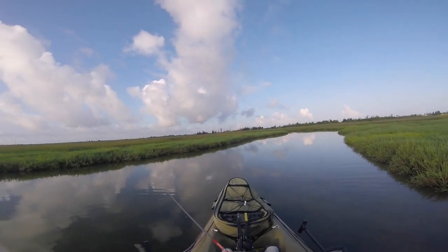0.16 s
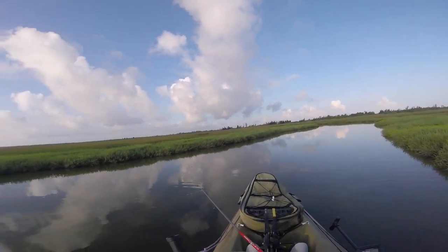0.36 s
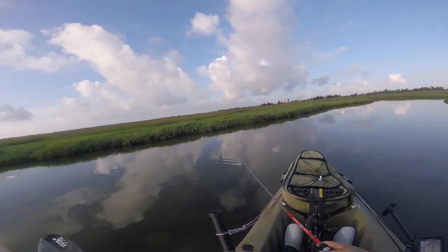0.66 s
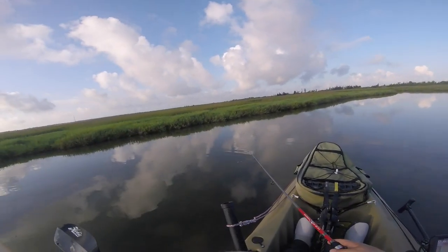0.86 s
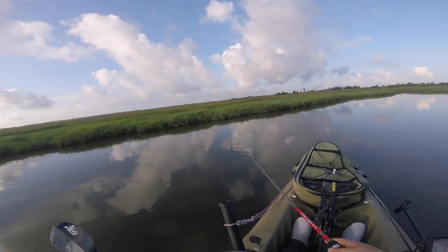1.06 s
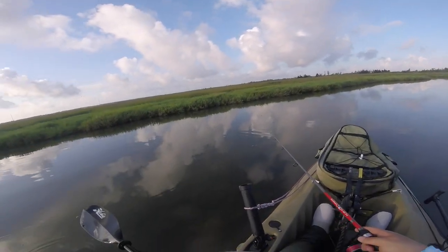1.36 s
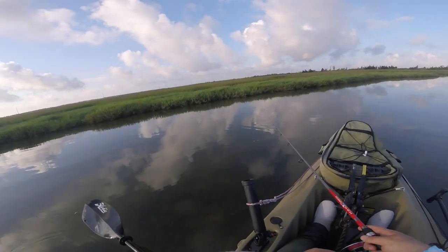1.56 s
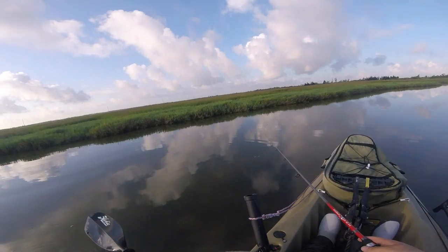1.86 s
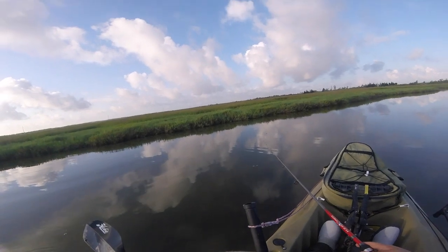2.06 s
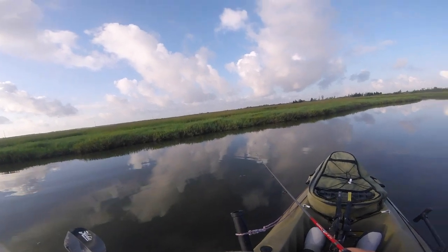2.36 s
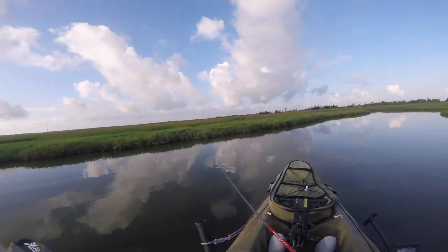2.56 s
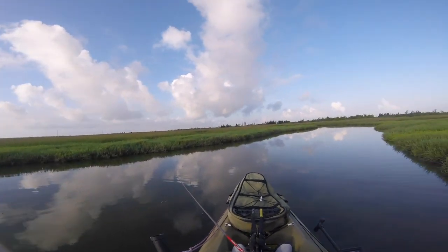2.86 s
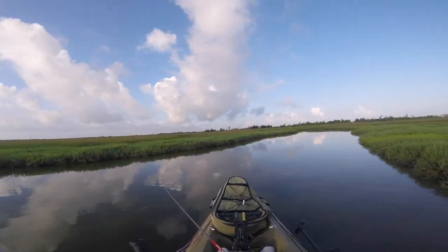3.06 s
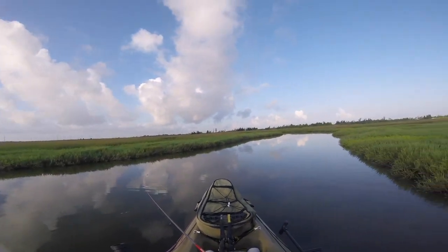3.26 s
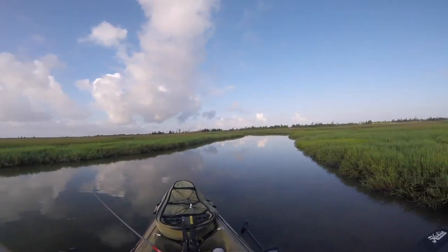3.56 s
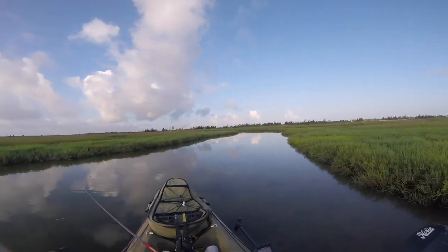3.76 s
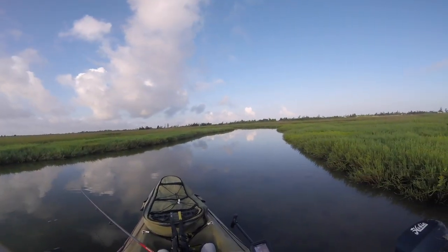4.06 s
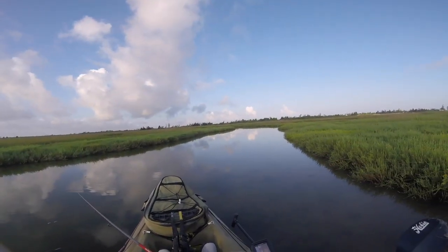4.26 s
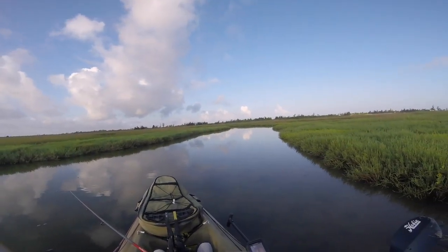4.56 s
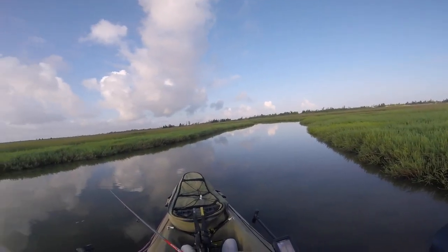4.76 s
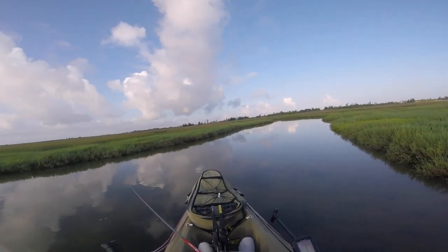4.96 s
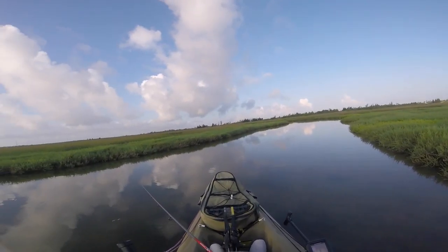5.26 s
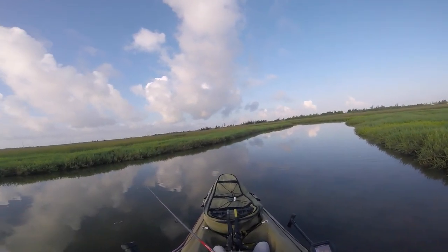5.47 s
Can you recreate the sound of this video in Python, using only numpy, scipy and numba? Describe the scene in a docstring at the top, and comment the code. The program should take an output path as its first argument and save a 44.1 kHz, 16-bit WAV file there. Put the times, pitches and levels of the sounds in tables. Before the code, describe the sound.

A dense chorus of insects buzzes throughout from open marsh, high and rapidly pulsing, above a soft wash and low distant engine rumble. A sharp click snaps close to the microphone early on, and a brighter one comes late. After each, the whole background dips abruptly and slowly returns. Two tiny chirps are barely noticeable near the second click. Mono.

```python
"""A chorus of insects buzzes in the grass of a calm marsh creek, around a drifting kayak: sine tones pulsed by wing
strokes, in a low crowd, a high crowd and one nearer singer, with a faint noise rasp.
Two sharp clicks close to the boat are damped impulses; each makes the camera's limiter duck everything, then recover.
Two tiny chirps are swept sines from the marsh. Filtered noise and a wavering sine make a low distant rumble. Mono.
"""
import sys
import numpy as np
from scipy import signal
from scipy.fft import rfft, irfft
from scipy.io import wavfile
from scipy.ndimage import map_coordinates
from numba import njit

SR = 44100
rng = np.random.default_rng(int(sys.argv[2]) if len(sys.argv) > 2 else 0)


def int16_out(signal):
    """Quantize to a 16-bit WAV file."""
    q = np.round(np.clip(np.atleast_2d(signal).T, -1, 1) * 32767)
    wavfile.write(sys.argv[1], SR, q.astype(np.int16))


N = 248283
T = np.arange(N) / SR  # time in seconds


def undb(db):
    """Decibels to gain."""
    return 10 ** (np.asarray(db) / 20)


def level(x, db):
    """Set the rms level in dB."""
    return x * undb(db) / np.sqrt(np.mean(x ** 2))


def spectrum_db(points, hz):
    """Read (Hz, dB) points on a log-frequency axis."""
    point_hz, point_db = np.transpose(points)
    return np.interp(np.log(hz + 1), np.log(point_hz), point_db)


def colour(x, points):
    """Filter a sound with a curve of (Hz, dB) points."""
    gain = undb(spectrum_db(points, np.fft.rfftfreq(N, 1 / SR)))
    return irfft(rfft(x) * gain, N)


def noise():
    """White noise."""
    return rng.standard_normal(N)


def walk(rate):
    """Smooth random drift with a spread near 1, changing about rate times a second."""
    knots = rng.standard_normal(1024)
    # drawn once per 64 samples, then held
    drift = map_coordinates(knots, [T[::64] * rate], order=3, mode="wrap")
    return drift[np.arange(N) // 64]


# Colour of the distant rumble. Each row: frequency in Hz, relative density in dB per Hz.
RUMBLE_COLOUR = [(10, -27), (20, -8), (32, -2), (48, -4.5), (72, -6), (88, -1.5), (108, -6), (138, -5),
                 (160, -8.5), (210, -11), (280, -16), (360, -22.5), (600, -35.5), (1500, -61.5)]
# Colour of the softer wash above it. Each row: frequency in Hz, relative density in dB per Hz.
WASH_COLOUR = [(150, -18), (400, 1), (700, -1), (1030, -1), (1400, -5), (2000, -7.5), (2800, -10.5),
               (3500, -14.5), (4300, -19.5), (6000, -21), (13000, -27.5)]
# A far engine's unsteady drone. The row: mean pitch in Hz, width of its wander in Hz, level in dB with its
# flutter included.
ENGINE_DRONE = (45.5, 7.03, -32)


def distance():
    """Far motors carry over the flat water as a rumble, a drone and a soft wash that swells once."""
    rumble = level(colour(noise(), RUMBLE_COLOUR), -30.0) * undb(0.76 * walk(5.05))

    hz, width_hz, drone_db = ENGINE_DRONE
    drone_hz = hz + width_hz / 2 * walk(12)
    drone_tone = np.sin(2 * np.pi * np.cumsum(drone_hz) / SR)
    drone = level(drone_tone * undb(1.4 * walk(6)), drone_db)

    # the swell rises and falls by 1/e in each swell_s
    crest_s, swell_s, crest_db = 1.6, 0.56, 1.5
    swell_db = crest_db * np.exp(-np.abs(T - crest_s) / swell_s)
    wash = level(colour(noise(), WASH_COLOUR), -41.0) * undb(swell_db + 0.67 * walk(8))
    return rumble + drone + wash


# Tiny marsh chirps. Each row: start in seconds, length in seconds, start, middle and end pitch in Hz, peak in dB.
MARSH_CHIRPS = [(4.048, 0.014, 3800, 3560, 3000, -36.5), (4.742, .03, 7340, 7400, 7260, -41)]


def chirps():
    """Brief whistles from the grass: sines on a curved pitch glide, swelling and fading as half a sine."""
    out = np.zeros(N)
    for start_s, length_s, *pitch, db in MARSH_CHIRPS:
        progress = np.linspace(0, 1, int(length_s * SR))
        hz = np.polyval(np.polyfit([0, .5, 1], pitch, 2), progress)
        tone = np.sin(2 * np.pi * np.cumsum(hz) / SR)
        i = int(start_s * SR)
        out[i:i + len(progress)] += undb(db) * np.sin(np.pi * progress) * tone
    return out


def ring(x, hz, width_hz):
    """One resonance: a decaying complex rotation, faster to die the wider it is."""
    pole = np.exp((2j * np.pi * hz - np.pi * width_hz) / SR)
    return signal.lfilter([1], [1, -pole], x).imag


def scatter(x, t60):
    """A diffuse tail of many small reflections, with unit energy, falling 60 dB in t60 seconds."""
    t = T[:SR // 4]
    tail = rng.standard_normal(len(t)) * np.exp(-np.log(1000) * t / t60)
    return signal.fftconvolve(x, tail / np.linalg.norm(tail))[:N]


# Colour of a click's body. Each row: frequency in Hz, relative level in dB.
BODY_COLOUR = [(200, -26), (1200, -16.5), (1800, -7.5), (2700, 1.5), (3450, -1.5), (4400, -11.5),
               (5200, -23), (6200, -18), (7500, -26), (9700, -30), (11000, -50), (15000, -37)]
# High rings of the clicking piece. Each row: frequency in Hz, width in Hz, dB relative to the pulse's peak before
# the click's brightness is added.
HIGH_RINGS = [(6300, 460, -25), (9500, 450, -40)]


def snap(tilt_db, size=1024):
    """An impulse through a heavily damped body: a short causal pulse and faint high rings."""
    hz = np.fft.rfftfreq(size, 1 / SR)
    body_db = spectrum_db(BODY_COLOUR, hz) + tilt_db * np.log2((hz + 100) / 3000)
    # folding the cepstrum packs the energy just after the impulse
    cepstrum = irfft(np.log(undb(body_db)))
    cepstrum[1:size // 2] *= 2
    cepstrum[size // 2 + 1:] = 0
    pulse = irfft(np.exp(rfft(cepstrum)))

    impulse = signal.unit_impulse(size)
    rings = sum(undb(ring_db + tilt_db) * ring(impulse, ring_hz, width_hz)
                for ring_hz, width_hz, ring_db in HIGH_RINGS)
    return pulse / np.abs(pulse).max() + rings


# Clicks near the boat. Each row: start in seconds, pulse peak in dB before the limiter, brightness in dB per octave,
# delay of the hull's reflection in seconds, its share of the direct gain.
BOAT_CLICKS = [(0.7062, 2.5, -0.5, 0.00178, 0.15), (4.3917, 4.5, 2, 0.00112, 0.22)]


def clicks():
    """Sharp snaps, each with a delayed copy off the hull and a short scatter from the boat."""
    out = np.zeros(N)
    for start_s, db, tilt_db, delay_s, share in BOAT_CLICKS:
        pulse = undb(db) * snap(tilt_db)
        for arrival_s, gain in ((start_s, 1), (start_s + delay_s, share)):
            i = int(arrival_s * SR)
            out[i:i + len(pulse)] += gain * pulse
    return out + undb(-17.5) * scatter(out, t60=.1)


def strokes(rate, wander, grip):
    """Pressure of the scraper on the file: one swell per wing stroke, sharper with more grip."""
    phase = np.cumsum(rate * (1 + wander * walk(6))) / SR + rng.random()
    return np.exp(grip * np.cos(2 * np.pi * phase))


def insect(hz, rate, width_hz, grip, waver_db):
    """Each stroke drags the file over the scraper; uneven teeth let the wing's tone slip in phase."""
    slip = np.sqrt(2 * np.pi * width_hz / SR) * noise()
    tone = np.sin(np.cumsum(2 * np.pi * hz / SR + slip))
    song = tone * strokes(rate, wander=0.014, grip=grip)
    return level(song, 0) * undb(waver_db * walk(9))


# Colour of the song. Each row: frequency in Hz, relative level in dB.
SONG_COLOUR = [(5000, -50), (5650, -24), (5900, -5.5), (6100, -7), (6400, 0.5), (7100, -5), (7300, -8.5),
               (7520, -22), (8500, -33)]


def chorus(hz, spread_hz, rate, rate_spread, db, count):
    """Many insects, each with its own pitch and stroke rate."""
    carriers = hz + spread_hz * np.linspace(-1, 1, count)
    rates = rate * np.exp(rate_spread * rng.standard_normal(count))
    song = sum(insect(carrier, stroke_rate, width_hz=140, grip=0.97, waver_db=-0.5)
               for carrier, stroke_rate in zip(carriers, rates))
    return level(colour(song, SONG_COLOUR), db)


# The two crowds. Each row: middle carrier in Hz, spread of carriers in Hz to either side, wing strokes per second,
# random spread of stroke rates as a share, level in dB (for the high crowd, before its effort).
LOW_CROWD = (6510, 90, 66, 0.13, -33)
HIGH_CROWD = (6919, 140, 66, -0.04, -32.5)
# Effort of the high crowd, who ease off and join in again. Each row: time in seconds, dB from full song.
HIGH_CROWD_EFFORT = [(.25, 0.5), (.8, -5), (1.25, -1.5), (2.55, -1.5), (3.35, 1.2), (5.5, -0.9)]
# The nearest insect. The row: carrier in Hz, wing strokes per second, level in dB.
NEAREST_INSECT = (6720, 66.3, -37)
# Broad rasp of the wing files. Each row: frequency in Hz, relative density in dB per Hz.
RASP_COLOUR = [(3500, -42), (5000, -11.5), (5600, -6), (6500, -2.5), (7700, 1.5), (9000, -1.5),
               (10400, -10), (11800, -6), (12800, -8), (13600, -25.5)]


def insects():
    """A low crowd, a high crowd that eases off for a while, one nearer buzz and the faint rasp of their wings."""
    low = chorus(*LOW_CROWD, count=7)
    effort_db = np.interp(T, *np.transpose(HIGH_CROWD_EFFORT))
    high = chorus(*HIGH_CROWD, count=7) * undb(effort_db)

    hz, rate, near_db = NEAREST_INSECT
    near_song = insect(hz, rate, width_hz=669.5, grip=0.57, waver_db=0.0)
    near = level(colour(near_song, SONG_COLOUR), near_db)

    rasp_strokes = noise() * strokes(rate, wander=0.019, grip=0.06)
    rasp = level(colour(rasp_strokes, RASP_COLOUR), -46)
    return low + high + near + rasp


@njit
def limiter(x, ceiling, hold_s, release_s):
    """The gain drops at once to keep a peak under the ceiling, holds, then creeps back."""
    y, gain, wait_s = np.empty(len(x)), 1., 0.
    for i in range(len(x)):
        if abs(x[i]) * gain > ceiling:
            gain, wait_s = ceiling / abs(x[i]), hold_s
        elif wait_s > 0:
            wait_s -= 1 / SR
        else:
            gain += (1 - gain) / (release_s * SR)
        y[i] = x[i] * gain
    return y


def scene():
    """The marsh and the clicks, alike in both channels."""
    mono = distance() + chirps() + clicks() + insects()
    return np.array([mono, mono])


def record(dry):
    """The camera limits the peaks, then a steep low-pass cuts the top."""
    top_hz = 13300
    held = np.array([limiter(x, float(undb(-6)), hold_s=0.064, release_s=0.53) for x in dry])
    low_pass = signal.ellip(8, .2, 70, top_hz, fs=SR, output="sos")
    return signal.sosfilt(low_pass, held)


dry = scene()
out = record(dry)
int16_out(out)
```